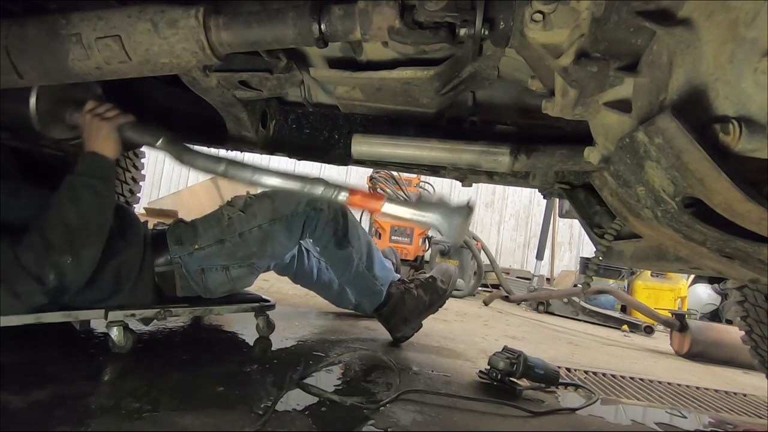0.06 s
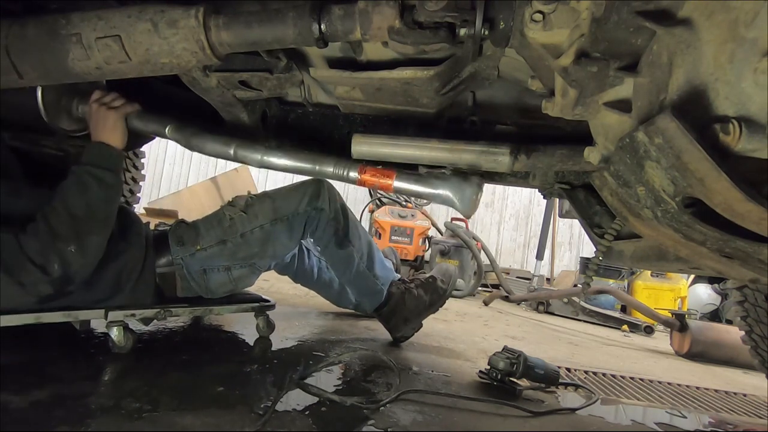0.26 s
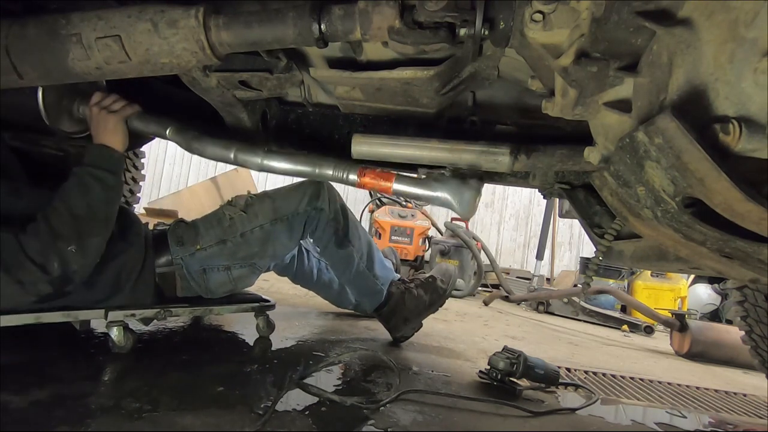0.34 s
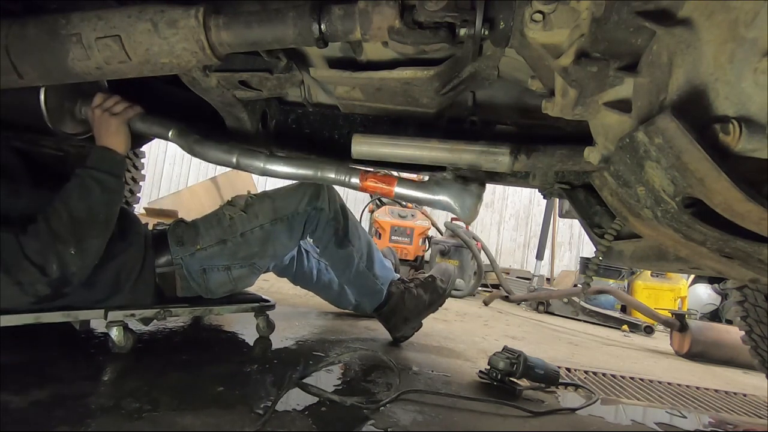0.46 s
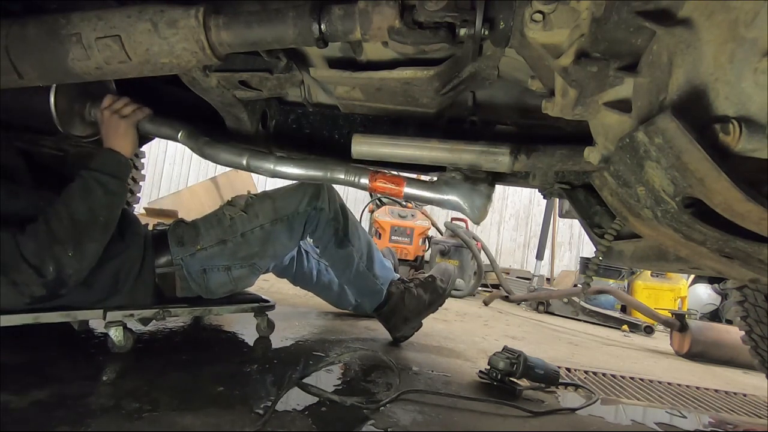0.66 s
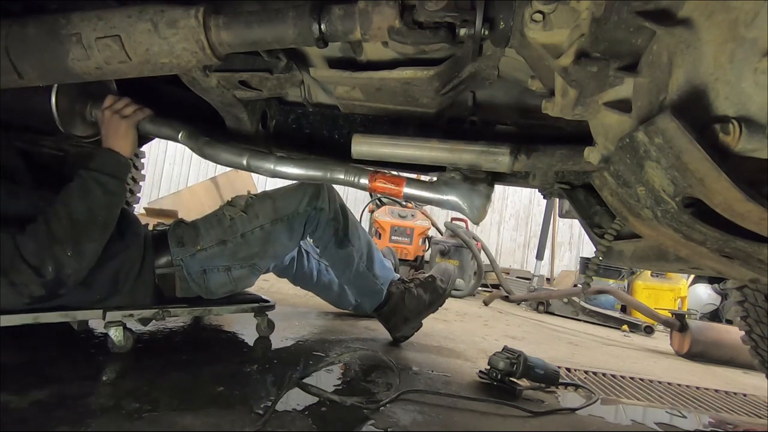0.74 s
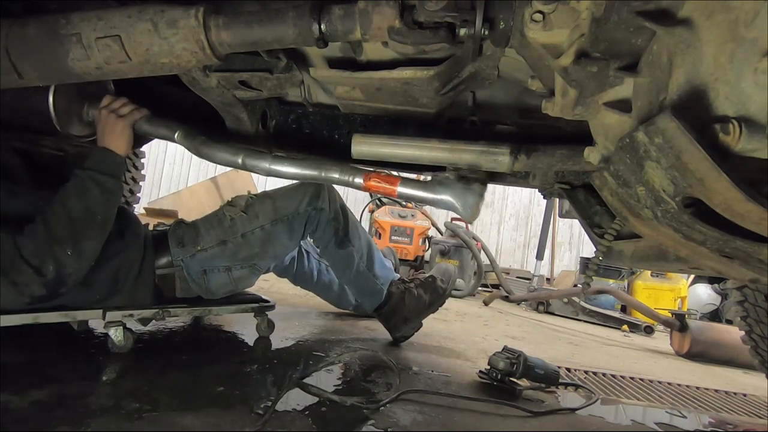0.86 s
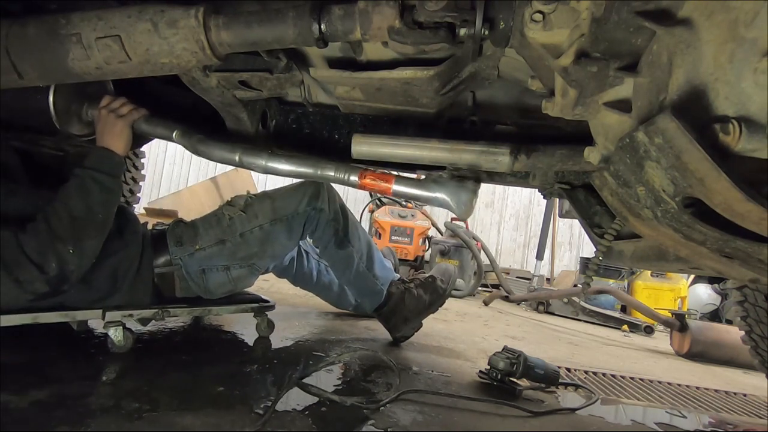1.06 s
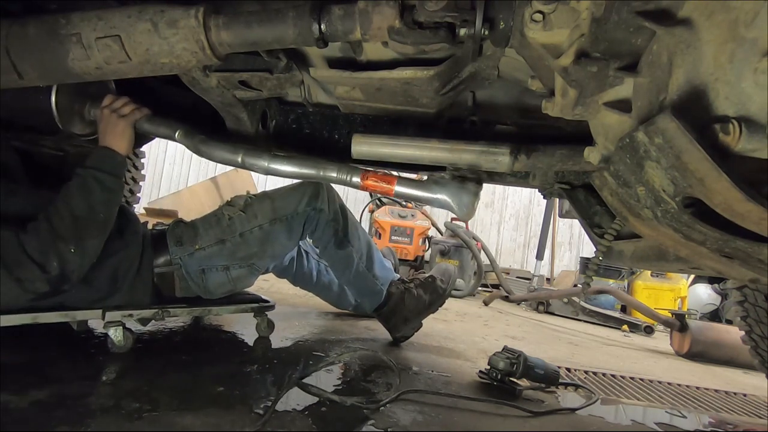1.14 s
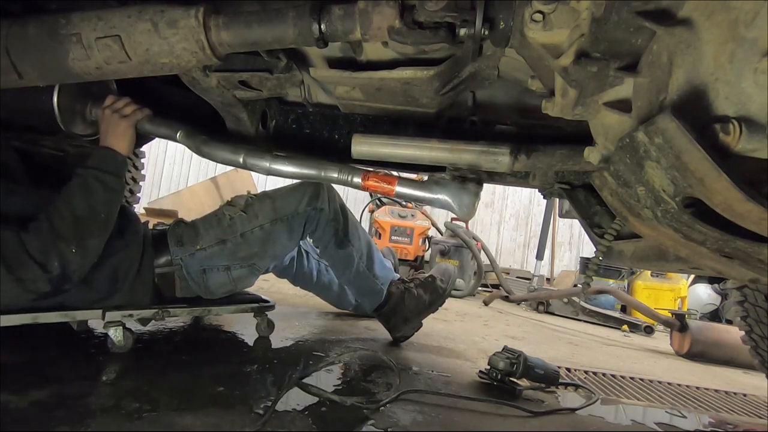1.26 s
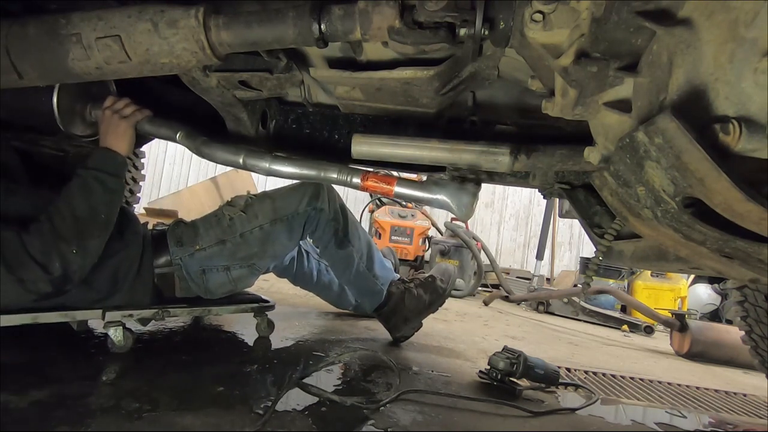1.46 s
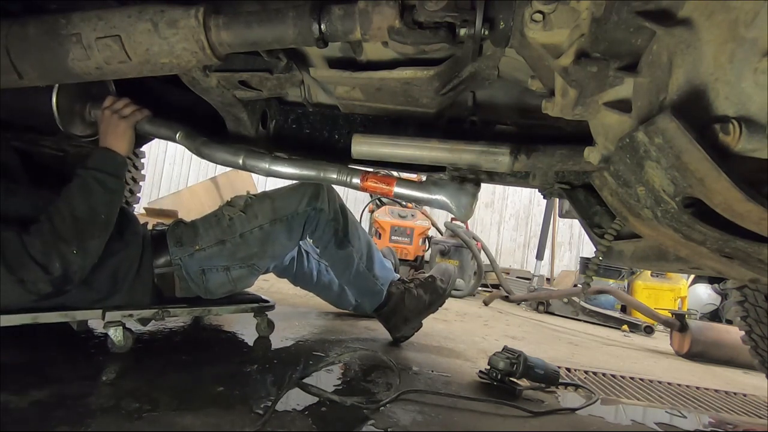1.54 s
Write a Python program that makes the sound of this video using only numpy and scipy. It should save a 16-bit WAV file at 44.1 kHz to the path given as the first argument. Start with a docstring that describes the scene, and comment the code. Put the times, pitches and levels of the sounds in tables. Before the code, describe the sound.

A hollow steel exhaust pipe clanks against a truck's underside: short scrapes and ticks, a bright double clack, a hard ringing knock, lighter taps, a quieter gap, then a second hard knock, heard close in a reverberant workshop.

```python
"""In a workshop, under a truck, one microphone hears a steel exhaust pipe being worked into place.
Random slips scrape the steel, single ones tick, and the pipe end catches in its joint with a bright clack.
Two hard, hollow knocks on the underbody, with lighter ones between, ring on in decaying pipe modes.
Each contact is coloured noise: a short flutter between floor and chassis, then the room's tail.
Low modes thump in the mounts; filtered noise gives the handling rumble and the still air."""
import sys
import numpy as np
from scipy import signal
from scipy.fft import rfft, irfft
from scipy.io import wavfile
from scipy.ndimage import uniform_filter1d

SR = 44100
rng = np.random.default_rng(int(sys.argv[2]) if len(sys.argv) > 2 else 0)


def int16_out(signal):
    """Quantize to a 16-bit WAV file."""
    q = np.round(np.clip(np.atleast_2d(signal).T, -1, 1) * 32767)
    wavfile.write(sys.argv[1], SR, q.astype(np.int16))


N = 70560  # length in samples
T = np.arange(N) / SR  # time in seconds
EDGES_HZ = np.geomspace(28, 17000, 38)  # quarter-octave band edges
PIVOT_HZ = 1000  # every tilt turns about this frequency

# Dull rumble of the pipe being handled. Each row: time in seconds, level in dB.
HANDLING_LEVELS = [(0, -37.5), (.07, -32.5), (.15, -41.5), (.22, -38.5), (.29, -29.5), (.44, -37),
                   (.6, -26), (.93, -50), (1.07, -45), (1.17, -50.5)]
# Spectrum of that rumble. Each row: frequency in Hz, density in dB per Hz.
HANDLING_COLOUR = [(30, -16), (70, -1), (120, 1), (320, -2), (450, -9), (1500, -24.5), (4000, -32.5),
                   (12000, -54.5)]
# Still workshop air. Each row: frequency in Hz, density in dB per Hz.
AIR_COLOUR = [(25, 3.5), (120, 8.5), (500, -23), (2000, -33), (6000, -36), (16000, -41.5)]
AIR_DB = -51.5

# Steel sliding on steel. Each row: start in seconds, length in seconds, level in dB.
SCRAPES = [(0.033, 0.03, -38.5), (0.087, 0.058, -38), (0.368, 0.037, -35.5), (0.428, 0.13, -43),
           (0.848, 0.058, -46), (0.93, 0.08, -52), (1.127, 0.081, -55)]
# Spectrum of scrapes and ticks. Each row: frequency in Hz, density in dB per Hz.
SCRAPE_COLOUR = [(300, -13), (850, 3), (1600, -7.5), (3700, -2.5), (5000, -10.5), (8000, -23),
                 (12000, -23.5), (16000, -47)]
SLIPS_PER_S, SLIP_SPREAD_DB = 870, 3
SCRAPE_SWELL_S, SCRAPE_RELEASE_S = 0.029, 0.015
# Single slips. Each row: start in seconds, level in dB, tilt in dB per octave.
TICKS = [(0.0365, -33.5, -0.5), (0.145, -34, -1), (0.18, -42.5, 5.5), (0.329, -41, 2.5)]

# Pipe end catching in the joint. Each row: start in seconds, level in dB, tilt in dB per octave,
# level of the clear ring in dB, contact spot from 0 to 1.
CLACKS = [(0.2236, -19, 4, -26.5, 0.04), (0.2321, -30.5, -0.5, -23.5, 0.05), (.25, -21, -4.5, -26.5, 0),
          (0.983, -39.5, -2.5, -39.5, 0.65), (1.003, -40.5, -4, -46.5, 1), (1.021, -43, -3.5, -45.5, 0.77)]
# Dense ring of the joint. Each row: frequency in Hz, density in dB per Hz.
CLACK_COLOUR = [(30, -31), (65, -19), (130, -23), (300, -11.5), (570, -1), (1050, -3), (1400, -7),
                (2450, -8.5), (3050, -2.5), (3450, -14.5), (4100, -7), (4650, -21), (5500, -15),
                (7800, -22.5), (15000, -62)]
# Clear modes of the joint. Each row: frequency in Hz, T60 in seconds,
# level in dB when struck at spot 0, level in dB when struck at spot 1.
JOINT_MODES = [(246, .6, -9, -12), (291, .55, -5, -12), (322, .6, -7, -6), (545, .13, 4, -5),
               (618, .13, 2, -4), (716, .3, -10, -13), (856, .3, -7, -11), (1017, .22, -6, -18),
               (1092, .22, -9, 4.5), (2015, .13, 2, -9), (2977, .14, 2.5, 0), (3644, .26, -14, -9),
               (5157, .09, -4, -18), (5663, .07, 0, -19), (6724, .08, -9, -26)]

# Weight of the pipe landing in its mounts. Each row: start in seconds, level in dB.
THUMPS = [(0.23, -16), (0.481, -20.5), (0.989, -31), (1.062, -35.5), (1.227, -25.5)]
# Modes of the pipe in its mounts. Each row: frequency in Hz, T60 in seconds, level in dB.
MOUNT_MODES = [(97.7, 0.21, -5.5), (111.6, 0.36, -2.5), (146.3, 0.38, -4.5)]
THUMP_LOW_HZ = 87.5

# Pipe knocking on the underbody. Each row: start in seconds, level in dB, tilt in dB per octave,
# level of the clear ring in dB, contact spot from 0 to 1.
KNOCKS = [(.478, -11.5, 0.48, 1, 0.01), (.548, -36, 3, -12.5, 1), (.583, -24.5, 0.05, -26, 1),
          (0.679, -29.5, -0.57, -12.5, 0.6), (1.2204, -14.5, -0.46, 0.5, 0.86)]
# Dense ring of pipe and underbody. Each row: frequency in Hz, density in dB per Hz.
KNOCK_COLOUR = [(35, -25), (85, -3), (140, -10), (335, -1.5), (480, -7), (675, 2.5), (760, -9), (990, -5.5),
                (1340, -16), (1500, -20.5), (1850, -25.5), (2350, -20.5), (2850, -25.5), (3450, -20),
                (4350, -26.5), (4750, -35), (5500, -31.5), (7000, -43.5), (9300, -41.5), (15000, -70.5)]
# Clear modes of the pipe. Each row: frequency in Hz, T60 in seconds,
# level in dB when struck at spot 0, level in dB when struck at spot 1.
PIPE_MODES = [(187, .95, -28, -30), (333, .5, -21, -23), (375, .55, -21, -25), (453, .55, -33, -25),
              (534, .7, -29, -29.5), (651, .45, -25, -24), (690, .33, -17, -18), (798, .35, -30, -27),
              (849, .6, -31, -33), (957, .36, -19, -27), (1028, .38, -24.5, -29), (1075, .45, -29, -27),
              (1200, .25, -27, -31), (1297, .25, -29, -33), (2062, 1.4, -52, -46), (2121, .8, -43, -34),
              (2268, 1.15, -34, -39), (2427, 1.2, -41, -40), (3346, .33, -30, -34), (3483, .36, -32, -39),
              (3592, .25, -26.5, -44), (4104, .5, -50, -37), (5626, .35, -50, -47), (6272, .42, -48, -48)]
# Short bark of the panel giving way. Each row: frequency in Hz, T60 in seconds, level in dB.
PANEL_MODES = [(380, 0.04, 3), (1313, 0.04, -4)]
PANEL_LAG_S = 0.00393

# Flutter under the truck and the room tail, by name: attack and hold in seconds, flutter T60 in seconds,
# room level in dB, room tilt in dB per octave.
SCRAPE_SHAPE = dict(attack_s=0.0015, hold_s=0.0071, t60_s=0.096, room_db=-6, room_tilt_db=-1.5)
CLACK_SHAPE = dict(attack_s=0.00096, hold_s=0.0064, t60_s=.12, room_db=-15.5, room_tilt_db=-1.5)
KNOCK_SHAPE = dict(attack_s=0.00096, hold_s=0.021, t60_s=0.1, room_db=-7.5, room_tilt_db=-0.5)
# Decay of the room. Each row: frequency in Hz, T60 in seconds.
ROOM_T60 = [(150, 0.98), (700, 0.65), (2500, 1.06), (5000, 0.67)]
# Random humps in the noise of the dense ring. Each row: frequency in Hz,
# contrast (0 even, 1 like plain noise, more for a peakier noise).
HUMP_CONTRAST = [(900, 0.05), (2000, 1.72)]
HUMP_WIDTH_HZ, BROAD_WIDTH_HZ = 70, 900  # spans that smooth the spectrum of the dense ring
RING_RISE_S = 0.0013


def from_db(db):
    """Decibels to gain."""
    return 10 ** (np.asarray(db) / 20)


def rms_one(x):
    """Scale to rms 1."""
    return x / np.sqrt(np.mean(x ** 2) + 1e-20)


def at_hz(points, hz):
    """Read a table on a log-frequency axis."""
    table_hz, value = np.transpose(points)
    return np.interp(np.log(hz), np.log(table_hz), value)


def delayed(x, start_s):
    """Start a sound at the given time."""
    silence = np.zeros(max(int(start_s * SR), 0))
    return np.concatenate([silence, x])[:N]


def spectrum_hz():
    """Frequencies of the spectrum of 2 N samples, kept off zero for the logarithms."""
    return np.maximum(np.arange(N + 1) * SR / (2 * N), 1)


def band_centres():
    """Centre frequencies of the quarter-octave bands."""
    return np.sqrt(EDGES_HZ[1:] * EDGES_HZ[:-1])


def noise_bands():
    """Unrelated noise in each band, with the filters' first half second dropped."""
    bands = []
    for band in zip(EDGES_HZ, EDGES_HZ[1:]):
        sos = signal.butter(2, band, "band", fs=SR, output="sos")
        bands.append(signal.sosfilt(sos, rng.standard_normal(N + SR // 2))[-N:])
    return np.array(bands)


def band_gains(colour):
    """Gain of each band for a spectrum in dB per Hz; total power 1."""
    gain = from_db(at_hz(colour, band_centres())) * np.sqrt(np.diff(EDGES_HZ))
    return gain / np.linalg.norm(gain)


def coloured(x, colour, tilt_db=0):
    """Causal minimum-phase filter of power gain 1 with the given spectrum, tilted in dB per octave."""
    hz = spectrum_hz()
    bass_rolloff = hz / np.hypot(hz, EDGES_HZ[0])
    gain = from_db(at_hz(colour, hz) + tilt_db * np.log2(hz / PIVOT_HZ)) * bass_rolloff
    # folding the cepstrum forward in time makes the filter causal
    cepstrum = irfft(np.log(rms_one(gain) + 1e-9))[:N]
    cepstrum[1:] *= 2
    response = np.exp(rfft(cepstrum, 2 * N))
    return irfft(rfft(x, 2 * N) * response)[:N]


def evened(x):
    """Level the random humps of a noise's bass; sharpen those of its treble into a peakier, more metallic noise."""
    spectrum = rfft(x, 2 * N)
    bins_per_hz = 2 * N / SR
    power = uniform_filter1d(np.abs(spectrum) ** 2, int(HUMP_WIDTH_HZ * bins_per_hz))
    power = np.maximum(power, 1e-12)
    broad = np.maximum(uniform_filter1d(power, int(BROAD_WIDTH_HZ * bins_per_hz)), 1e-12)
    humps = (power / broad) ** at_hz(HUMP_CONTRAST, spectrum_hz())
    return irfft(spectrum * np.sqrt(power.mean() / power * humps))[:N]


def dense_ring(attack_s, hold_s, t60_s, room_db, room_tilt_db):
    """Noise for a dense blur of sound: a short flutter, then the room's tail dying band by band."""
    hz = band_centres()[:, None]
    flutter = rng.standard_normal(N) * from_db(-60 * np.maximum(T - hold_s, 0) / t60_s)
    room_level_db = room_db + room_tilt_db * np.log2(hz / PIVOT_HZ)
    tail = noise_bands() * from_db(room_level_db - 60 * T / at_hz(ROOM_T60, hz))
    return evened((flutter + tail.sum(axis=0)) * np.minimum(T / attack_s, 1))


def struck_at(modes, spot, tilt_db=0):
    """Modes of a body struck between its two contact spots, tilted in dB per octave."""
    struck = []
    for hz, t60_s, *spot_levels_db in modes:
        level_db = np.interp(spot, [0, 1], spot_levels_db) + tilt_db * np.log2(hz / PIVOT_HZ)
        struck.append((hz, t60_s, level_db))
    return struck


def ring(modes, scatter=1):
    """Each mode is a decaying sine, at a random phase; with no scatter they start in step."""
    tones = 0
    for hz, t60_s, db in modes:
        sine = np.sin(2 * np.pi * (hz * T + scatter * rng.random()))
        tones = tones + from_db(db - 60 * T / t60_s) * sine
    return tones * np.minimum(T / RING_RISE_S, 1)


def background():
    """Band-filtered noise: handling rumble over the still air of the workshop."""
    bands = np.array([rms_one(band) for band in noise_bands()])
    handling_gain = from_db(np.interp(T, *np.transpose(HANDLING_LEVELS)))
    rumble = handling_gain * (band_gains(HANDLING_COLOUR) @ bands)
    air = (band_gains(AIR_COLOUR) @ bands)[::-1]  # the same noise, reversed in time
    return rumble + from_db(AIR_DB) * air


def scrapes():
    """Tiny slips of uneven size rattle the steel during each push."""
    push = 0
    for start_s, length_s, db in SCRAPES:
        swell = np.clip((T - start_s) / SCRAPE_SWELL_S, 0, 1)
        release = np.exp(-np.maximum(T - start_s - length_s, 0) / SCRAPE_RELEASE_S)
        push = push + from_db(db) * swell * release
    slip_now = rng.random(N) < SLIPS_PER_S / SR
    direction = rng.choice([-1, 1], N)
    size = from_db(SLIP_SPREAD_DB * np.minimum(rng.exponential(1, N), 3))
    slips = slip_now * direction * size
    steel = coloured(dense_ring(**SCRAPE_SHAPE), SCRAPE_COLOUR)
    return signal.fftconvolve(push * rms_one(slips), steel / np.linalg.norm(steel))[:N]


def ticks():
    """Single slips of the steel, each sounding its dense ring once, stand out from the scraping."""
    body = dense_ring(**SCRAPE_SHAPE)
    out = 0
    for start_s, db, tilt_db in TICKS:
        out = out + delayed(from_db(db) * coloured(body, SCRAPE_COLOUR, tilt_db), start_s)
    return out


def clacks():
    """Hard, short contacts shake the joint; its clear modes follow half of each contact's tilt."""
    body, out = dense_ring(**CLACK_SHAPE), 0
    for start_s, db, tilt_db, ring_db, spot in CLACKS:
        contact = from_db(db) * coloured(body, CLACK_COLOUR, tilt_db)
        modes = struck_at(JOINT_MODES, spot, 0.5 * tilt_db)
        out = out + delayed(contact + from_db(ring_db) * ring(modes), start_s)
    return out


def thumps():
    """The whole pipe bounces in its mounts, ringing low modes in step; it radiates no deep bass."""
    bounces = 0
    for start_s, db in THUMPS:
        # the minus sign makes the first swing negative
        bounces = bounces + delayed(-from_db(db) * ring(MOUNT_MODES, scatter=0), start_s)
    sos = signal.butter(2, THUMP_LOW_HZ, "high", fs=SR, output="sos")
    return signal.sosfilt(sos, bounces)


def knocks():
    """Every knock dents the panel and shakes the same body; the contact spot decides which pipe modes sing."""
    body, out = dense_ring(**KNOCK_SHAPE), 0
    bark = delayed(ring(PANEL_MODES, scatter=0), PANEL_LAG_S)
    for start_s, db, tilt_db, ring_db, spot in KNOCKS:
        blow = from_db(db) * (coloured(body, KNOCK_COLOUR, tilt_db) + bark)
        pipe = from_db(ring_db) * ring(struck_at(PIPE_MODES, spot))
        out = out + delayed(blow + pipe, start_s)
    return out


def scene():
    """All sources at one microphone under the truck."""
    return (background() + scrapes() + ticks() + clacks() + thumps() + knocks())[None]


def record(dry):
    """Peaks stop at full scale, then a steep low-pass cuts the top."""
    sos = signal.cheby2(12, 70, 17000, fs=SR, output="sos")  # 70 dB down from 17 kHz up
    return signal.sosfilt(sos, np.clip(dry, -1, 1))


dry = scene()
out = record(dry)
int16_out(out)
```